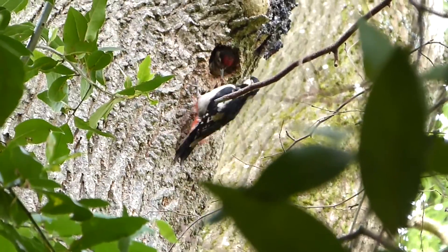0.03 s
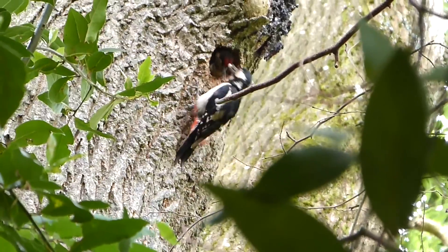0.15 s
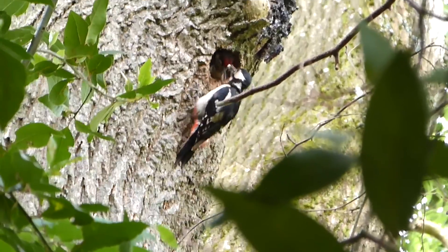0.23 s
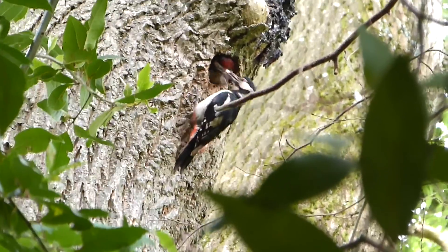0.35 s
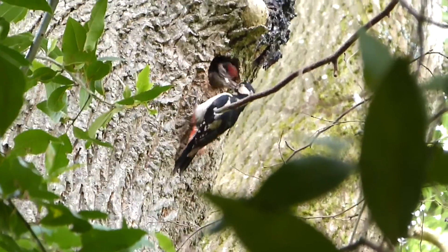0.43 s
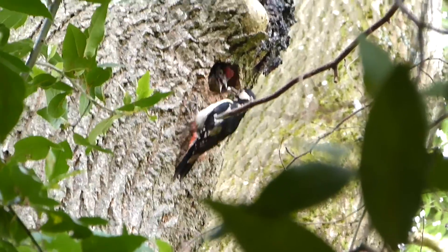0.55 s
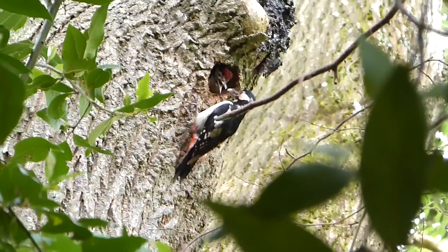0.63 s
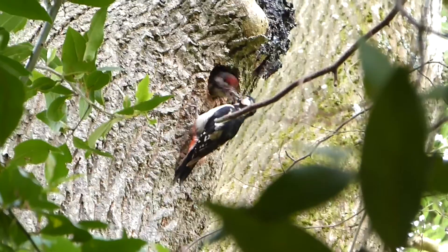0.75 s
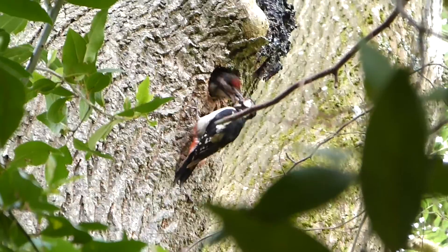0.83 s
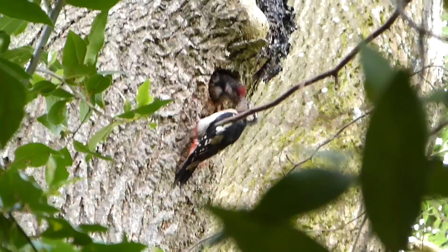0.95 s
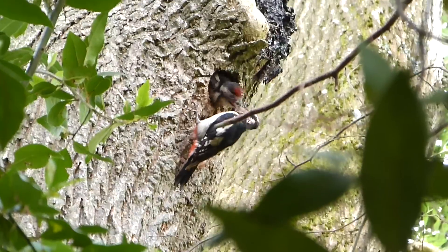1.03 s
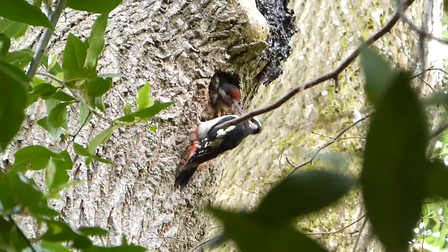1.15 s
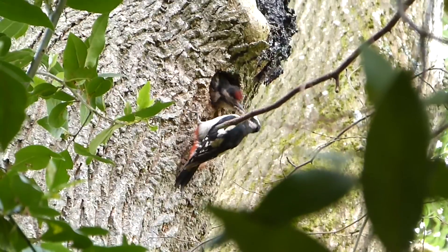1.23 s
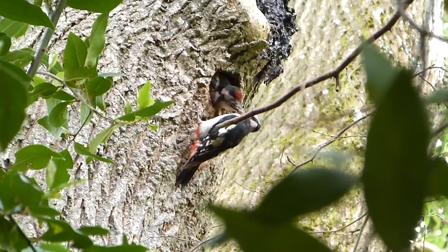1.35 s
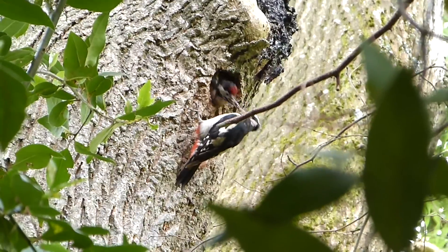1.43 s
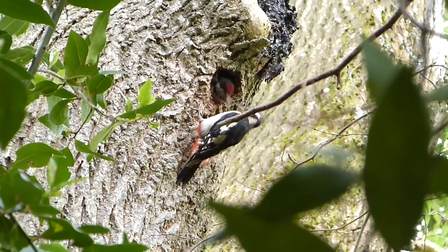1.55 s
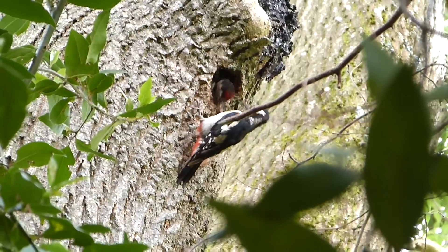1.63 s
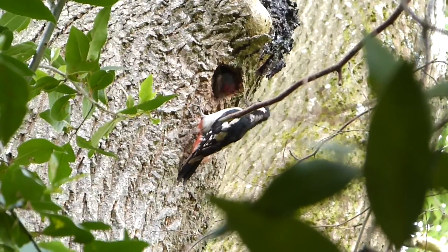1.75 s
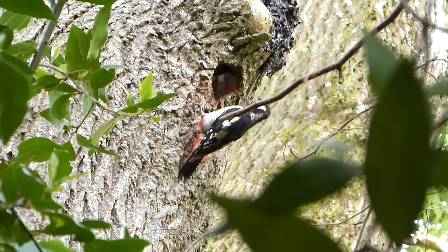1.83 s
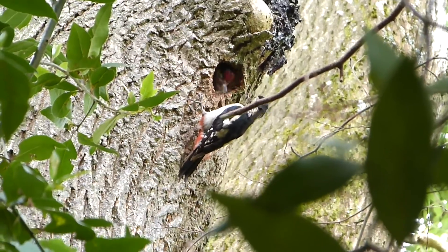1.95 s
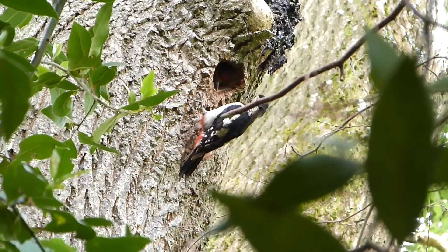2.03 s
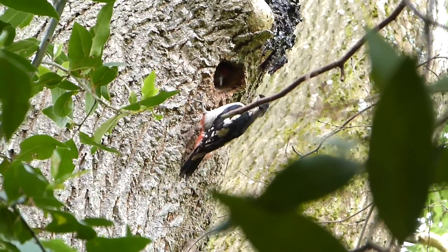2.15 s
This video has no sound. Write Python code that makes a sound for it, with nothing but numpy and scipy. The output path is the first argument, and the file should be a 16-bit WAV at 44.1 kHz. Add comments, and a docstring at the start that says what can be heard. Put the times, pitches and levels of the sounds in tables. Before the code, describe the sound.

A woodpecker chick begs in short, high, breathy squeaks, about five a second, many preceded by a faint rasp. They are strongest from 0.2 to 1.0 seconds, fade to a tiny one near 1.5, then end as clipped, lower, hoarser chirps from 1.75 to 2. One soft, low, dove-like coo glides at 0.45 to 0.7. Trunks and leaves echo lightly over a steady, soft garden hush.

```python
"""Short, mostly arched squeaks, about five a second, turn lower and hoarser at the end; one soft low coo joins them.
A woodpecker chick begs from its nest hole: harmonics and breath noise, coloured by throat and beak.
A second bird, probably a dove, coos on a gliding sine. Trunks and leaves scatter the calls as echoes
and decaying noise tails, over the steady hush of a wooded garden made of shaped noise."""
import sys
import numpy as np
from scipy import signal
from scipy.fft import rfft, irfft
from scipy.io import wavfile

SR = 44100
rng = np.random.default_rng(int(sys.argv[2]) if len(sys.argv) > 2 else 0)


def persist_wave(psi):
    """Save psi, clipped to +-1, as 16-bit WAV."""
    counts = np.round(np.clip(psi, -1, 1) * 32767).astype(np.int16)
    wavfile.write(sys.argv[1], SR, np.atleast_2d(counts).T)


N = 97020
TIME = np.arange(N) / SR
NOISE_SIZE = 2 ** 13  # samples in each short noise draw
FAR_BUILD_S = 0.02  # build-up time of the distant reflections


def from_db(db):
    """Logarithmic level: 20 dB is a factor of ten in amplitude."""
    return 10 ** (np.asarray(db) / 20)


def rms_one(x):
    """Normalisation by mean power: the result has rms 1."""
    return x / np.sqrt(np.mean(x ** 2) + 1e-20)


def at_hz(points, hz):
    """Spectral interpolation: a curve is read on a log-frequency axis."""
    point_hz, value = np.transpose(points)
    return np.interp(np.log(np.maximum(hz, 1)), np.log(point_hz), value)


def split_ears(left_minus_right_db):
    """Level-difference stereo: half the difference is added at left and taken off at right, in dB."""
    return np.array([[0.5], [-0.5]]) * left_minus_right_db


def flutter(hz, size):
    """Low-pass noise: random wavering mostly below hz, normalised to rms 1."""
    f = np.fft.rfftfreq(NOISE_SIZE, 1 / SR)
    white = rng.standard_normal(NOISE_SIZE)
    wavering = irfft(rfft(white) / (1 + (f / hz) ** 2))
    return rms_one(wavering)[:size]


def delayed(x, s):
    """Propagation delay: a phase linear in frequency shifts the sound s seconds later."""
    f = np.fft.rfftfreq(2 * N, 1 / SR)
    shifted = irfft(rfft(x, 2 * N) * np.exp(-2j * np.pi * f * s))
    return shifted[..., :N]


def scatter(x, t60_s, build_s):
    """Diffuse reverberation: dense reflections build up and decay, independent at each ear."""
    t = TIME[:SR]
    envelope = from_db(-60 * t / t60_s) * (1 - np.exp(-t / build_s))
    tail = rng.standard_normal((2, SR)) * envelope
    tail /= np.sqrt(np.sum(tail ** 2, axis=1, keepdims=True))  # unit energy
    return signal.fftconvolve(np.atleast_2d(x), tail, axes=1)[:, :N]


def rush(size):
    """Turbulence noise: air rushing through the open beak, with a broad shaped spectrum and rms 1."""
    # spectrum of the rushing air: hz, relative_db
    rush_spectrum = [(1000, -17), (1700, 3.5), (2600, -4), (3400, -6), (5000, -23), (6500, 5), (8500, -2),
                     (11500, 4), (13000, -17), (16000, -34)]
    f = np.fft.rfftfreq(NOISE_SIZE, 1 / SR)
    white = rng.standard_normal(NOISE_SIZE)
    shaped = irfft(rfft(white) * from_db(at_hz(rush_spectrum, f)))
    return rms_one(shaped)[:size]


def squeak(middle_s, length_s, level_db, start_hz, mid_hz, end_hz, beak_hz, boost_db, rough, tilt_db):
    """Source-filter principle: harmonics on a pitch curve, least jittered mid-note, pass throat and beak."""
    # response of the throat: hz, relative_db
    throat = [(1300, 0.5), (2300, -9), (3300, -2.5), (4600, -2), (7000, -5), (9500, -9), (12000, -15.5),
              (14500, -25), (17000, -47)]
    # stereo balance of the partials: hz, left_minus_right_db
    chick_pan = [(2300, -3), (4600, -7), (7000, -2), (9500, -3.5), (13000, 0)]
    core_rough, edge_rough = 0.3, 2.93  # hoarseness mid-note, and what the edges add
    jitter, shimmer, waver_hz = 0.07, 1, 556  # pitch and amplitude wavering
    rush_db, skirt_db, skirt_hz = 4.5, -7.5, 580  # relative to the note and scaled by roughness
    tilt_pivot_hz, beak_octaves = 5000, 0.41  # beak_octaves: half width of the resonance

    size = int(length_s * SR)
    u = np.linspace(-1, 1, size)  # -1 at the start, 0 mid-note, 1 at the end
    hoarse = rough * (core_rough + edge_rough * u ** 2)
    slope_hz = (end_hz - start_hz) / 2
    bend_hz = (end_hz + start_hz) / 2 - mid_hz
    pitch = mid_hz + slope_hz * u + bend_hz * u ** 2
    jittered_pitch = pitch * (1 + jitter * hoarse * flutter(waver_hz, size))
    phase = 2 * np.pi * np.cumsum(jittered_pitch) / SR
    effort = np.maximum(1 - u ** 2, 0)
    wavering = 1 + shimmer * hoarse * flutter(waver_hz, size)

    breath = from_db(level_db + rush_db) * rough * effort * rush(size)
    note = np.tile(breath, (2, 1))
    for k in range(1, 10):
        hz = k * pitch
        beak_db = boost_db / (1 + (np.log2(hz / beak_hz) / beak_octaves) ** 2)
        colour_db = at_hz(throat, hz) + beak_db + tilt_db * np.log2(hz / tilt_pivot_hz)
        # complex noise round the carrier spreads each partial into a turbulent skirt
        noise = flutter(skirt_hz, size) + 1j * flutter(skirt_hz, size)
        skirt = from_db(skirt_db) * rough * k / 2 * noise
        # overtones come in later and leave sooner than the fundamental
        swell = effort ** (1.385 if k > 1 else 0.68)
        carrier = np.real((1 + skirt) * np.exp(1j * k * phase))
        partial = swell * wavering * carrier * (hz < SR / 2)
        note += partial * from_db(level_db + colour_db + split_ears(at_hz(chick_pan, hz)))

    since = np.arange(N) - round((middle_s - length_s / 2) * SR)  # samples since the onset
    return np.array([np.interp(since, np.arange(size), np.sqrt(2) * ear, left=0, right=0) for ear in note])


def chick():
    """Direct sound plus reflections: squeaks and rasps, a little to the right, echo among leaves and trunks."""
    # the squeaks: middle_s, length_s, relative_level_db, start_hz, mid_hz, end_hz,
    # beak_hz, beak_boost_db, roughness (0-1), tilt_db_per_octave
    squeaks = [ (-.010, 0.095, -46.5, 1950, 2440, 2050, 7300, 16.5, 0.42, 5),
               (0.206, 0.053, -32.5, 1994, 2266, 2064, 4800, 1.5, 0.29, 1.8),
               (0.41, 0.063, -32, 1715, 2438, 1697, 7960, 11.5, 0.29, 2.5),
               (0.613, 0.055, -34, 1657, 2448, 1817, 7380, 16.5, 0.26, 6.5),
               (0.83, 0.051, -35, 1819, 2339, 1580, 5480, 22.5, 0.21, 3.5),
               (1.038, 0.035, -36, 1622, 2311, 2220, 5540, 24, 0.18, 1),
               (1.289, 0.037, -41.5, 2734, 2310, 2320, 6000, 24.5, 0.18, -0.5),
               (1.53, 0.035, -48, 2760, 2615, 2240, 2550, 5, 0.14, -3),
               (1.547, 0.013, -57, 2900, 2860, 2850, 5940, 20.5, 0.13, 3),
               (1.768, 0.026, -42.5, 2476, 1925, 1566, 5440, 16.5, 0.63, 0),
               (1.921, .028, -43, 1897, 1790, 1474, 5040, 10.5, 0.52, 0.5),
               (2.07, 0.023, -43, 1762, 1651, 1380, 5460, 13, 0.41, -3.5)]
    # faint rasps just before most squeaks: middle_s, relative_level_db
    rasps = [(0.161, -47), (0.369, -44), (0.577, -44), (0.792, -38.5), (1.014, -43), (1.759, -53),
             (1.91, -50), (2.056, -54)]
    # distinct echoes: delay_s, gain_db
    chick_echoes = [(0.027, -12.5), (0.053, -21.5)]
    rasp_length_s, rasp_hz, rasp_db = 0.037, 1315, -9.5  # rasp_db is added to each rasp's level
    rasp_beak_hz, rasp_boost_db, rasp_rough, rasp_tilt_db = 6870, 12.5, 0.644, -0.5

    voice = sum(squeak(*row) for row in squeaks)
    for middle_s, db in rasps:
        voice = voice + squeak(middle_s, rasp_length_s, db + rasp_db, rasp_hz, rasp_hz, rasp_hz,
                               rasp_beak_hz, rasp_boost_db, rasp_rough, rasp_tilt_db)
    voice = from_db(2) * voice  # overall level of the chick
    mono = voice.mean(axis=0)
    direct = np.array([delayed(voice[0], 0.000026), voice[1]])  # the left ear lags
    echoes = sum(from_db(db) * delayed(direct, s) for s, db in chick_echoes)
    leaves = from_db(-4.5) * scatter(mono, t60_s=0.22, build_s=0.0031)  # foliage round the nest
    near = from_db(-5) * scatter(direct, t60_s=0.07, build_s=0.00033)
    far = from_db(-14) * scatter(mono, t60_s=0.51, build_s=FAR_BUILD_S)
    return direct + echoes + leaves + near + far


def dove():
    """Frequency modulation: the integral of a gliding pitch drives one sine, whose level swells and sags."""
    # the coo: time_s, pitch_hz, relative_level_db
    coo_track = [(.425, 360.8, -56), (0.442, 352.5, -42.5), (0.465, 439.5, -30.5), (0.476, 370, -34),
                 (0.509, 406.4, -30.5), (0.523, 417, -29), (0.534, 475.5, -25.5), (0.558, 504.6, -31.5),
                 (0.598, 492.4, -30.5), (0.642, 466.8, -29.5), (0.657, 466.4, -25), (0.704, 440, -23.5),
                 (.718, 421, -31), (.732, 415, -71)]
    # distinct echoes: delay_s, gain_db
    coo_echoes = [(.046, -15.5), (.19, -25)]
    s, hz, db = np.transpose(coo_track)
    level = from_db(np.interp(TIME, s, db)) * (TIME > s[0]) * (TIME < s[-1])
    phase = 2 * np.pi * np.cumsum(np.interp(TIME, s, hz)) / SR
    coo = np.sqrt(2) * level * np.sin(phase)
    echoes = sum(from_db(echo_db) * delayed(coo, lag_s) for lag_s, echo_db in coo_echoes)
    tail = scatter(coo, t60_s=1, build_s=FAR_BUILD_S)
    narrowed_tail = (tail + tail.mean(axis=0)) / 2  # the ears partly share the tail
    coo = coo + echoes + from_db(-17) * narrowed_tail
    return coo * from_db(split_ears(1.9))


def hush():
    """Interaural coherence: far traffic and leaves as shaped noise, alike in both ears in the bass."""
    # spectrum of the garden: hz, relative_db_per_hz
    hush_spectrum = [(25, -19), (45, -6), (62, -1), (90, -5.5), (120, -6.5), (160, 0.5), (260, 4.5),
                     (450, 1), (800, 0), (1500, -5.5), (3000, -7), (5000, -9), (7000, -14), (10000, -19),
                     (12000, -35), (14500, -47)]
    # likeness of the two ears: hz, left_right_correlation (-1 to 1)
    likeness = [(60, 0.95), (300, 0.98), (700, 0.89), (1400, 0.69), (3000, 0.41), (8000, 0.11)]
    f = np.fft.rfftfreq(N, 1 / SR)
    alike = np.clip(at_hz(likeness, f), -1, 1)
    white = rfft(rng.standard_normal((2, N)))
    mid, side = white * from_db(at_hz(hush_spectrum, f)) * (f > 15)
    ears = np.sqrt(1 + alike) * mid + np.sqrt(1 - alike) * side * [[1], [-1]]
    air = irfft(ears, N)
    return rms_one(air) * from_db(-39.5 + split_ears(0.1))


def scene():
    """Superposition: the pressures of both birds and the garden add."""
    return chick() + dove() + hush()


def record(dry):
    """Band limiting: a steep elliptic low-pass cuts the top above 15.2 kHz."""
    lowpass = signal.ellip(10, 0.1, 90, 15200, fs=SR, output="sos")
    return signal.sosfilt(lowpass, dry)


dry = scene()
out = record(dry)
persist_wave(out)
```